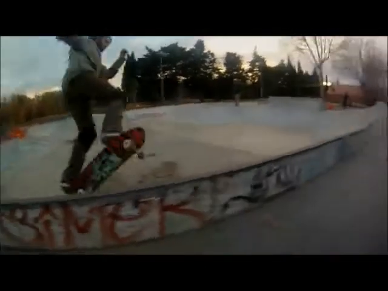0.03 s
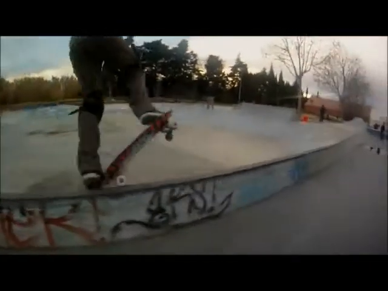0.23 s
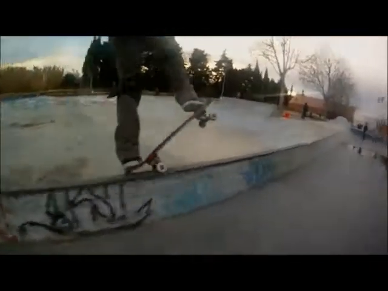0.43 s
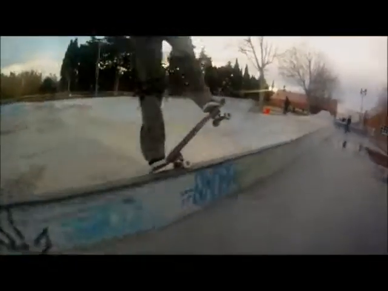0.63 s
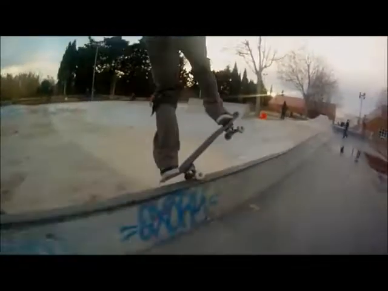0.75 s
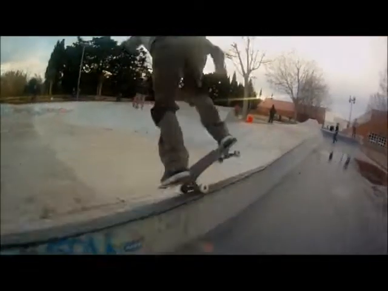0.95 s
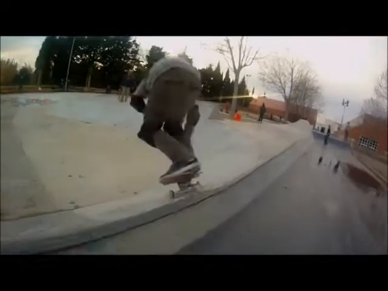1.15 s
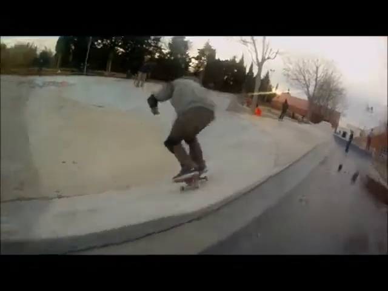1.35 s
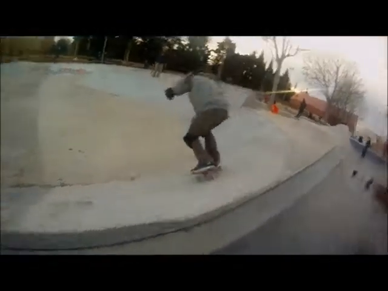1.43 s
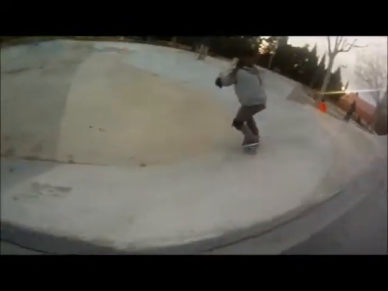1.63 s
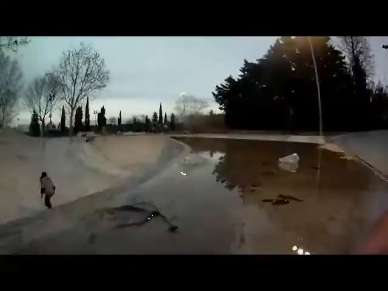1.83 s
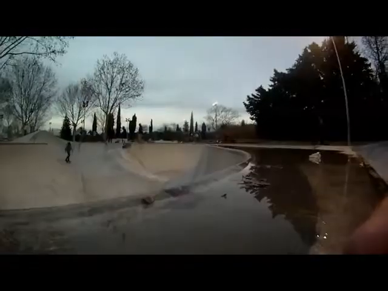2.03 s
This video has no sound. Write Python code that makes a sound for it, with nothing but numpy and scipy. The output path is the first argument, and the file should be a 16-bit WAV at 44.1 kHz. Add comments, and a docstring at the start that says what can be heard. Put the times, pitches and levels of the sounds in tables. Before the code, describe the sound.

A skateboard grinds close by on a concrete ledge at an open-air skate park, gritty and clunking. It slams down with short squeaks and hums away, with three small ticks on the camera before quiet outdoor air.

```python
"""A skateboard rolls up to a concrete ledge, knocks against the lip and grinds along on its back truck.
Grit and bumps in the edge shake the deck. The board drops off with a sharp clack, its wheels squeal
sideways, then hum and whirr away, while the housing of a small camera ticks three times.
The sound cuts out briefly and returns as the quiet air of the open skate park, with one faint knock."""
import sys
import numpy as np
from scipy import signal
from scipy.fft import rfft, irfft
from scipy.io import wavfile

SR = 44100
rng = np.random.default_rng(int(sys.argv[2]) if len(sys.argv) > 2 else 0)


def bounce(signal):
    """Save signal as a 16-bit WAV file at the path given by the first command-line argument."""
    frames = np.transpose(np.atleast_2d(signal))
    limited = np.clip(frames, -1, 1)
    pcm = np.round(limited * 32767).astype(np.int16)
    wavfile.write(sys.argv[1], SR, pcm)


N = 92610
T = np.arange(N) / SR
STRIKE_S = 0.0004  # rise of a hard contact
MUTE_START_S, MUTE_END_S = 1.860, 1.904


def amp(db):
    """Decibels to gain."""
    return 10 ** (np.asarray(db) / 20)


def unit(x):
    """Scale to rms 1."""
    return x / np.sqrt(np.mean(x ** 2) + 1e-20)


def level(points):
    """Gain curve from (t/s, level/dB) points; silent after the last."""
    return amp(np.interp(T, *np.transpose(points), right=-np.inf))


def colour(x, points):
    """Minimum-phase filter of unit energy, shaped by (f/Hz, level/dB) points."""
    hz, db = np.transpose(points)
    bins_hz = abs(np.fft.fftfreq(4096, 1 / SR))
    log_gain = np.log(amp(np.interp(np.log(bins_hz + 1), np.log(hz + 1), db)))
    impulse = np.fft.ifft(np.exp(np.conj(signal.hilbert(log_gain)))).real[:2048]
    return signal.fftconvolve(x, impulse / np.linalg.norm(impulse))[:N]


def ring(modes):
    """Impulse response of (f/Hz, level/dB, t60/s) modes."""
    t = T[:SR // 8]
    return sum(amp(db) * 1000 ** (-t / t60) * np.sin(2 * np.pi * hz * t) for hz, db, t60 in modes)


def resonate(force, modes):
    """Modes driven by a force."""
    return signal.fftconvolve(force, ring(modes))[:N]


def wobble(hz):
    """Smooth noise of rms 1, up to the given rate."""
    rolloff = 1 + (np.fft.rfftfreq(N, 1 / SR) / hz) ** 4
    return unit(irfft(rfft(rng.standard_normal(N)) / rolloff, N))


def grains(per_s, spread_db):
    """Random tiny collisions of uneven size, rms 1."""
    size, side, chance = rng.random((3, N))
    size_db = spread_db * np.minimum(-np.log(1 - size), 4)
    return unit((chance < per_s / SR) * np.sign(side - 0.5) * amp(size_db))


def blow(start_s, fall_s, rise_s=STRIKE_S):
    """Contact envelope: linear rise, exponential fall."""
    out, near = np.zeros(N), slice(*np.searchsorted(T, [start_s, start_s + rise_s + 10 * fall_s]))
    t = T[near] - start_s
    out[near] = np.minimum(t / rise_s, 1) * np.exp(-np.maximum(t - rise_s, 0) / fall_s)
    return out


def taps(times_s, levels_db):
    """One impulse per blow."""
    out = np.zeros(N)
    np.add.at(out, np.round(times_s * SR).astype(int), amp(levels_db))
    return out


def pip(start_s, hz, fall_s, glide=0):
    """A few damped cycles that swell and die, starting sharp by the fraction glide."""
    out, near = np.zeros(N), slice(*np.searchsorted(T, [start_s, start_s + 20 * fall_s]))
    t = T[near] - start_s
    bent_s = t + glide * 2 * fall_s * (1 - np.exp(-t / fall_s / 2))
    out[near] = (t / fall_s / 2) ** 2 * np.exp(2 - t / fall_s) * np.sin(2 * np.pi * hz * bent_s)
    return out


def radiate(x, cutoff_hz=363):
    """The small deck gives off little bass."""
    return signal.sosfilt(signal.butter(2, cutoff_hz, "highpass", fs=SR, output="sos"), x)


def park(level_db=-46):
    """Distant, even wash of open air."""
    air_tone = [(18, -42), (30, -25), (71, -6.5), (105, -17), (328, -8.5), (384, -3.5), (511, -5.5),
                (597, 0), (1370, -17.5), (1480, -10.5), (1830, -22.5), (3150, -21.5), (3780, -16),
                (7240, -33.5), (10400, -30), (11300, -26), (15000, -34)]  # air spectrum: f/Hz, level/dB
    return amp(level_db) * colour(rng.standard_normal(N), air_tone)


def hum():
    """Wavering wheel tone after the landing, sinking as the board slows."""
    track = [(1.16,174.4,-55.5),(1.28,140.3,-34.5),(1.38,123.3,-43),(1.44,109.6,-36),(1.52,113,-45),(1.6,105,-68)]  # wheel tone: t/s, f/Hz, level/dB
    times_s, hz, db = np.transpose(track)
    pitch_hz = np.interp(T, times_s, hz) * (1 + 0.048 * wobble(hz=27))
    level_db = np.interp(T, times_s, db, left=-120, right=-120) + 2.5 * wobble(hz=30)
    return amp(level_db) * np.sin(2 * np.pi * np.cumsum(pitch_hz) / SR)


def wheels():
    """Wheels patter over the concrete and whirr as they carve away; the slab rumbles."""
    up_curve = [(0,-25.5),(.03,-29.5),(.14,-28.5),(.2,-29.5),(.255,-30),(.28,-30.5),(.4,-53),(.45,-84)]  # approach: t/s, level/dB
    up_tone = [(35, -57), (60, -23), (79, -29), (126, -19.5), (190, -22), (251, -24.5), (381, -6.5),
               (438, -11.5), (577, -2), (835, -10), (938, -20), (1130, -16.5), (1300, -20.5), (1390, -18.5),
               (1710, -25.5), (2360, -24), (3050, -27.5), (4730, -19), (6230, -45.5), (10100, -31.5),
               (15000, -34)]  # its spectrum: f/Hz, level/dB
    away_curve = [(1.1,-87.5),(1.14,-30),(1.22,-35),(1.4,-34.5),(1.48,-31.5),(1.56,-35.5),(1.68,-33.5),(1.8,-36),(1.86,-30)]  # departure: t/s, level/dB
    away_tone = [(35,-24),(60,-10.5),(200,-16.5),(320,-8.5),(410,-7.5),(500,-1.5),(600,-1.5),(680,-3.5),(750,-2),(920,-8),(1080,-4),(1270,-6),(1580,-10),(1850,-17),(2300,-21),(3000,-12.5),(3800,-16),(4900,-17),(6000,-32.5),(7500,-30.5),(8600,-30),(15000,-32)]  # its spectrum: f/Hz, level/dB
    whirr_curve = [(1.2,-42),(1.4,-53),(1.56,-49),(1.66,-32.5),(1.76,-33.5),(1.86,-41)]  # carving swell: t/s, level/dB
    whirr_tone = [(400,-38),(900,-12),(1090,3.5),(1280,-4),(1550,-6),(1900,-36),(4000,-56)]  # its resonance: f/Hz, level/dB
    rumble_curve = [(0,-40.5),(.38,-68),(.46,-50),(.66,-31),(.88,-34.5),(1.05,-39.5),(1.2,-35),(1.33,-34.5),(1.5,-38),(1.6,-43),(1.86,-50.5)]  # slab rumble: t/s, level/dB
    rumble_tone = [(20,-21),(55,-13),(95,-5.5),(145,1.5),(210,-3.5),(330,-1),(520,-3.5),(900,-22),(3000,-35)]  # its spectrum: f/Hz, level/dB
    up = colour(level(up_curve) * grains(5000, 2.2) * amp(2.2 * wobble(hz=60)), up_tone)
    away = colour(level(away_curve) * grains(9000, 1.2) * amp(0.93 * wobble(hz=83)), away_tone)
    whirr = colour(level(whirr_curve) * rng.standard_normal(N), whirr_tone)
    rumble = colour(level(rumble_curve) * grains(1500, 0.37), rumble_tone)
    return (up + away + whirr + rumble) * (T < MUTE_START_S)


def ticks(snap_db=-9, snap_fall_s=0.0022):
    """Hard taps on the camera housing: a plastic pip, a short bright ring and a dry snap."""
    hits = [(1.6547,1.5,3100,0.00014,-25),(1.779,-19,3450,0.00027,-1.5),(1.8167,-7,4110,0.0003,2)]  # housing taps: t/s, level/dB, f/Hz, decay/s, relative brightness/dB
    housing_modes = [(9000,-23,0.066),(10030,4,0.0029),(10930,-1,0.0044),(11900,-10,0.0084),(14400,-9,.012)]  # housing ring: f/Hz, level/dB, t60/s
    snap_tone = [(500,-28),(2000,-12),(3000,2.5),(5500,2),(7000,-2.5),(9000,0),(13000,-1),(16000,-5)]  # snap spectrum: f/Hz, level/dB
    plastic = sum(amp(db) * pip(s, hz, fall_s, glide=0.54) for s, db, hz, fall_s, _ in hits)
    snap = sum(amp(db + bright + snap_db) * blow(s, snap_fall_s) for s, db, _, _, bright in hits)
    times_s, hit_db, _, _, bright_db = np.transpose(hits)
    housing = resonate(taps(times_s, hit_db + bright_db), housing_modes)
    return plastic + housing + colour(snap * rng.standard_normal(N), snap_tone)


def scuffs(rise_s=0.0041, release_s=0.0063):
    """Dry, sandy strokes as the board slides on and off the edge; coarse grains snap under them."""
    slides = [(0,0.0077,-34,-5),(0.298,0.022,-28.5,-1.5),(.321,0.036,-23,-3.5),(0.358,0.042,-30.5,3),(.403,0.016,-24,-6),(1.006,0.033,-25,-13),(1.041,0.036,-32,3.5),(1.15,.026,-33,-7)]  # strokes: t/s, length/s, level/dB, level change/dB
    snaps = [(.3075,-22),(0.322,-20),(0.326,-27),(0.38,-20.5),(.407,-25.5),(1.006,-18),(1.0165,-31)]  # coarse grains: t/s, level/dB
    scuff_tone = [(880, -22), (1500, -15.5), (1890, -7), (2100, -6), (2230, -6), (2620, -4), (2890, -0.5),
                  (4720, 0.5), (6430, -24), (10500, -22.5), (15000, -31)]  # scuff spectrum: f/Hz, level/dB
    strokes = np.zeros(N)
    for s, length_s, db, change_db in slides:
        gate = np.interp(T, [s, s + rise_s, s + length_s, s + length_s + release_s], [0, 1, 1, 0])
        strokes += gate * amp(db + change_db * np.clip((T - s) / length_s, 0, 1))
    bites = sum(amp(db) * blow(s, fall_s=0.0011) for s, db in snaps)
    return colour((strokes * amp(wobble(hz=200)) + bites) * grains(6000, 3.4), scuff_tone)


def squeals():
    """Short, unsteady stick-slip tones of wheels skidding sideways."""
    skids = [(1.048,0.044,1333,-18),(1.144,0.026,1750,-20.5)]  # wheel skids: t/s, length/s, f/Hz, level/dB
    drift = 1 + 0.055 * wobble(hz=250)
    out = np.zeros(N)
    for s, length_s, hz, db in skids:
        swell = np.sin(np.pi * np.clip((T - s) / length_s, 0, 1))
        out += amp(db) * swell * np.sin(2 * np.pi * np.cumsum(hz * drift) / SR)
    return out


def lip_knocks():
    """Wheels knock hollowly against the lip on the way up."""
    hits = [(0.2086,-15.5),(0.2324,-20.5)]  # wheel impacts: t/s, level/dB
    lip_modes = [(315,-11,.08),(449.3,0.5,0.13),(535,-23,0.077),(637,-16,0.095),(1114,-3.5,0.038),(1240,-20.5,0.027)]  # hollow ring: f/Hz, level/dB, t60/s
    return radiate(resonate(taps(*np.transpose(hits)), lip_modes))


def landing(truck_db=-5.5, impulse_db=11.5):
    """The board slams down: wood, hard crack and ringing truck, then dull knocks as it rolls off."""
    hits = [(1.077,-9,-10,0.0058),(1.086,-7,-5,0.0034),(1.094,-8.5,-17,0.0035),(1.101,-22,-18,0.0034),(1.1211,2.5,-2.5,0.0049),(1.131,-21,-40,0.004),(1.15,-18,-42,0.022),(1.160,-21,-35.5,.004),(1.172,-22.5,-39,0.0042)]  # clatter: t/s, wood level/dB, crack level/dB, decay/s
    far_hits = [(1.484,-30),(2,-37)]  # dull knocks: t/s, level/dB
    slam_tone = [(25,-45),(60,-34),(300,-12),(480,-6.5),(620,-3.5),(760,-1),(880,-13),(1100,3),(1380,-2),(1600,-20.5),(3000,-23),(15000,-55)]  # wood spectrum: f/Hz, level/dB
    crack_tone = [(100,-20),(1400,-8),(1800,3),(2200,-0.5),(3000,6),(3700,5.5),(4300,-3),(5200,-2.5),(6500,-18.5),(9000,-10.5),(15000,-16)]  # crack spectrum: f/Hz, level/dB
    truck_modes = [(1830,-14,0.084),(2430,-16,.08),(2529,-20,0.073),(2840,-24,0.072),(3070,-12,0.072),(3239,-25,0.074),(3630,-20,.07),(3750,-14.5,0.075)]  # metal ring: f/Hz, level/dB, t60/s
    wood = sum(amp(db) * blow(s, fall_s) for s, db, _, fall_s in hits)
    crack = sum(amp(db) * blow(s, fall_s) for s, _, db, fall_s in hits)
    far = sum(amp(db) * blow(s, fall_s=0.0017) for s, db in far_hits)
    times_s, wood_db, crack_db, _ = np.transpose(hits)
    metal = resonate(taps(times_s + STRIKE_S, crack_db + truck_db), truck_modes)
    slam = (0.87 * wood + far) * grains(9000, 0.43) + taps(times_s + STRIKE_S, wood_db + impulse_db)
    return radiate(metal) + colour(slam, slam_tone) + colour(crack * grains(9800, 0.72), crack_tone)


def grind(chatter_db=3, slide_db=3, clunk_db=-5.5, jolt_db=10.5, hiss_db=-2.5):
    """The truck chatters over grit and clunks over bumps, ringing the deck and spraying hiss."""
    load_curve = [(.29,-57),(.325,-29.5),(.39,-34.5),(.425,-24.5),(.48,-24),(.56,-22),(.65,-23.5),(.69,-25),(.765,-26.5),(.79,-31),(.84,-32),(.91,-31),(.96,-35),(1.02,-24),(1.07,-32),(1.11,-32),(1.17,-22),(1.2,-58)]  # pressure on the concrete, grind then skid: t/s, level/dB
    bumps = [(.321,-27,-27),(.4215,-16,-28),(.4355,-3.5,-15.5),(.470,-15,-22),(.492,-17,-25),(.506,-2,-13),(.529,-21,-25),(.541,-16.5,-23),(.551,-15,-17.5),(.587,-11.5,-25),(.610,-13.5,-26),(.621,-16,-36),(.647,-13,-17),(.660,-36,-40),(.707,-11,-17.5),(.7425,-13.5,-33),(.754,-20,-35),(.767,-33,-22.5),(.8075,-15.5,-22.5),(.8515,-12,-30),(.866,-20.5,-26),(.902,-29,-24),(.954,-19,-24.5),(.979,-19.5,-40),(.987,-17,-39)]  # bumps in the ledge: t/s, strength/dB, grit level/dB
    deck_modes = [(391,-17,0.041),(624,-1.5,0.048),(720,-3.5,0.038),(791.6,-2,0.042),(1043,-10.5,.035),(1129,-8.5,0.035),(1260,-9.5,0.024),(1472,-10,0.039),(1760,-20,0.027),(2170,-16,0.029)]  # deck and truck ring: f/Hz, level/dB, t60/s
    scrape_curve = [(.2,-64),(.212,-29),(.24,-31),(.265,-33),(.28,-34.5),(.31,-49)]  # thin scrape after the lip knocks: t/s, level/dB
    grit_tone = [(30,-27),(80,-12.5),(170,0.5),(400,-9.5),(1000,3.5),(1900,-4),(2500,-8),(3500,-1.5),(5100,-3),(5900,-18),(7500,-15.5),(10400,-10.5),(11700,-12.5),(14000,-10.5),(16000,-12)]  # grit spectrum: f/Hz, level/dB
    pressure = level(load_curve) * amp(chatter_db * (wobble(hz=103) + 0.28))
    rise_s = 0.003005
    shove, crush, clunks, deck = np.zeros((4, N))
    for s, db, grit_db in bumps:
        contact = blow(s, fall_s=0.0041, rise_s=rise_s)
        shove += amp(db) * contact
        crush += amp(grit_db) * contact
        clunks += amp(db + clunk_db) * pip(s, hz=789, fall_s=0.0017)
    times_s, strength_db, _ = np.transpose(bumps)
    jolts = taps(times_s + rise_s, strength_db + jolt_db)
    roughness = np.hypot(pressure, 0.58 * shove)
    for mode in deck_modes:  # the moving contact favours now one mode, now another
        friction = roughness * grains(2500, 2) * amp(slide_db * wobble(hz=13))
        deck += resonate(friction + jolts, [mode])
    hiss_gain = np.hypot(amp(hiss_db) * pressure, crush) + level(scrape_curve)
    hiss = colour(hiss_gain * grains(7000, 2), grit_tone)
    return clunks + radiate(deck) / np.linalg.norm(ring(deck_modes)) + hiss


def scene():
    """All sources at one microphone."""
    board = grind() + scuffs() + squeals() + lip_knocks() + landing() + wheels() + hum()
    return (board + ticks() + park())[None]


def record(dry):
    """Brief dropout, overload on the hardest blows, band limit."""
    ceiling, edge_hz = 0.94, 15500
    live = (T < MUTE_START_S) | (T > MUTE_END_S)
    clipped = np.clip(dry * live, -ceiling, ceiling)
    lowpass = signal.firwin(511, edge_hz, window=("kaiser", 8), fs=SR)
    return signal.oaconvolve(clipped, lowpass[None], "same")


dry = scene()
out = record(dry)
bounce(out)
```